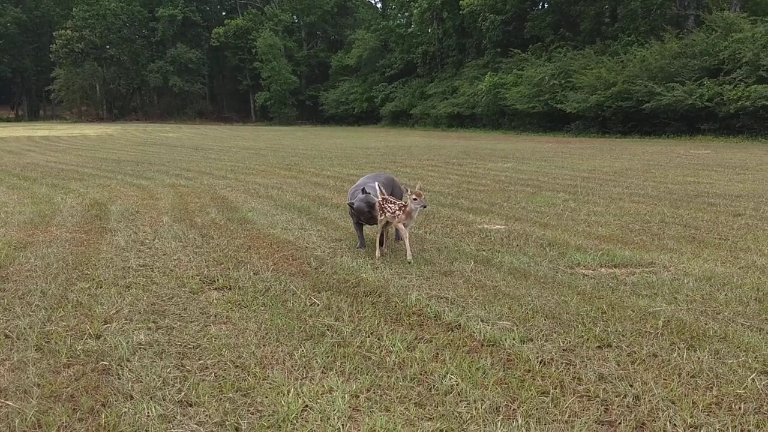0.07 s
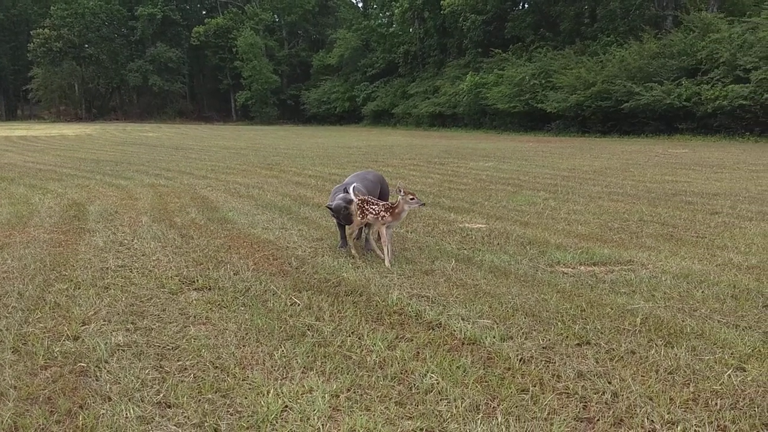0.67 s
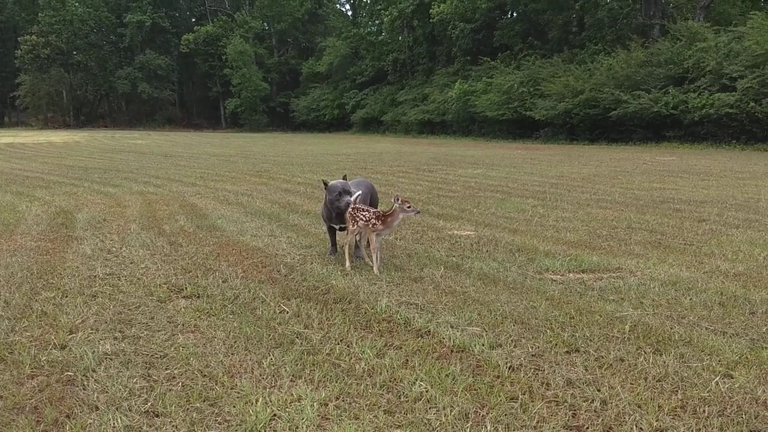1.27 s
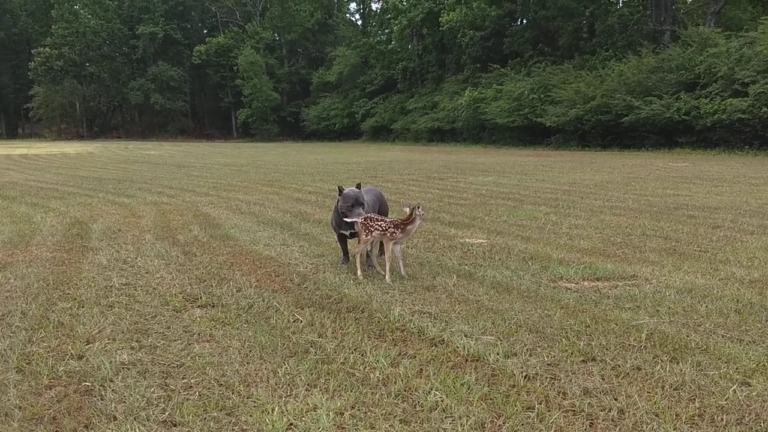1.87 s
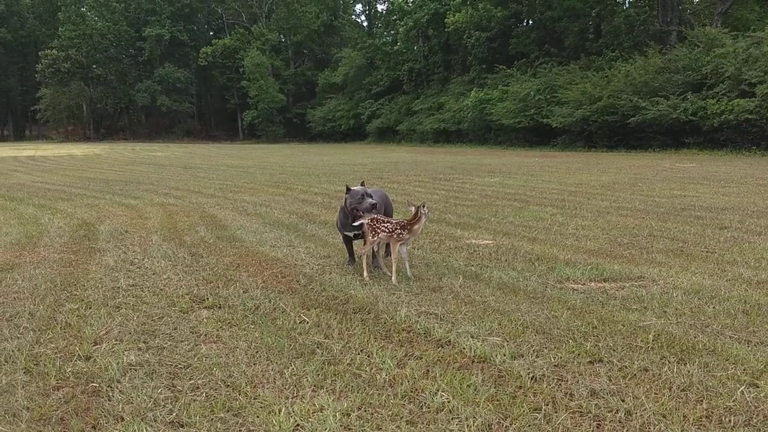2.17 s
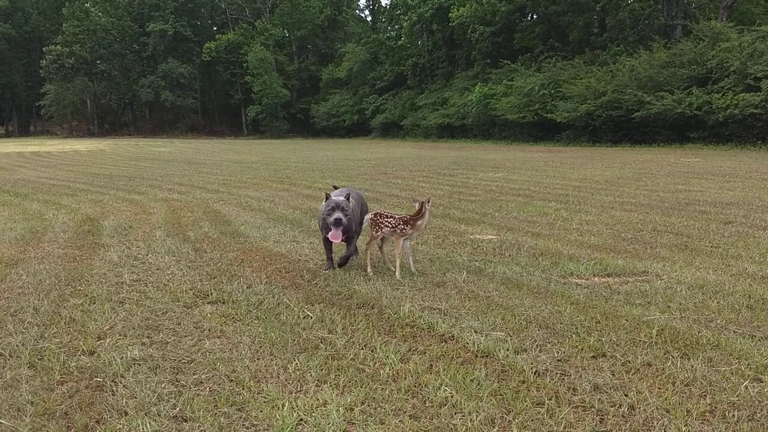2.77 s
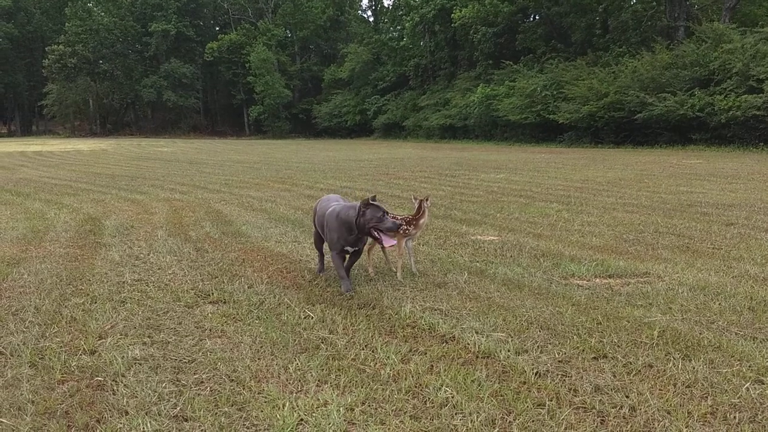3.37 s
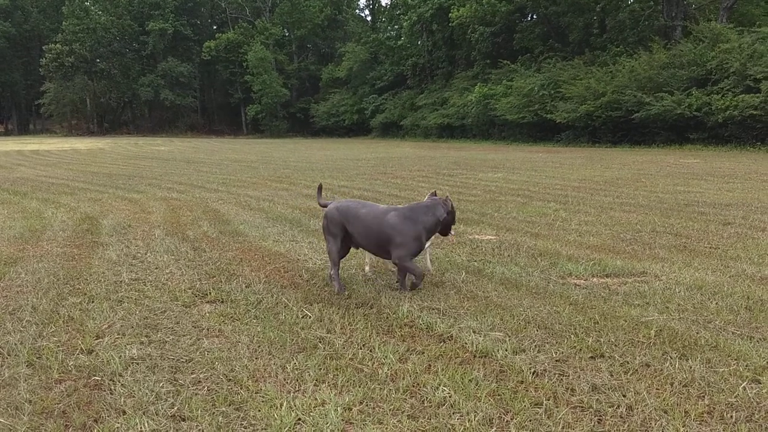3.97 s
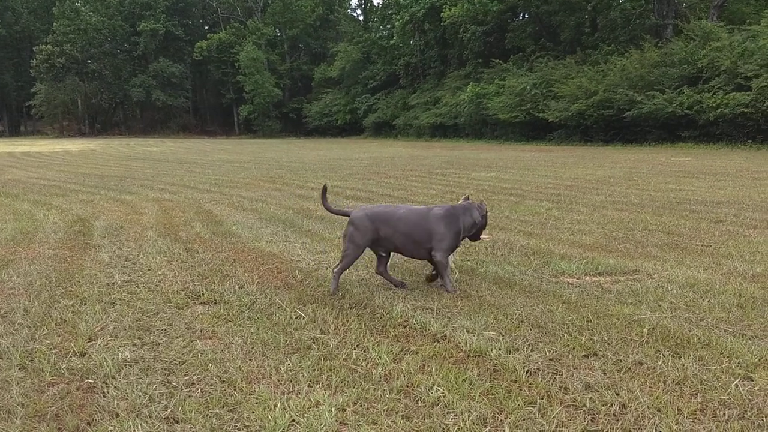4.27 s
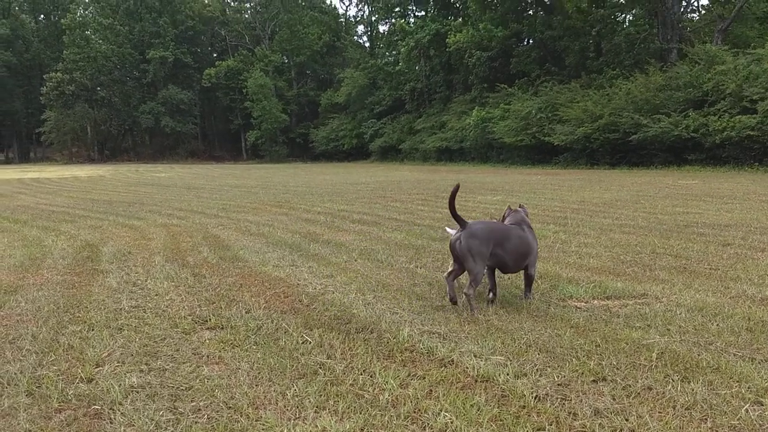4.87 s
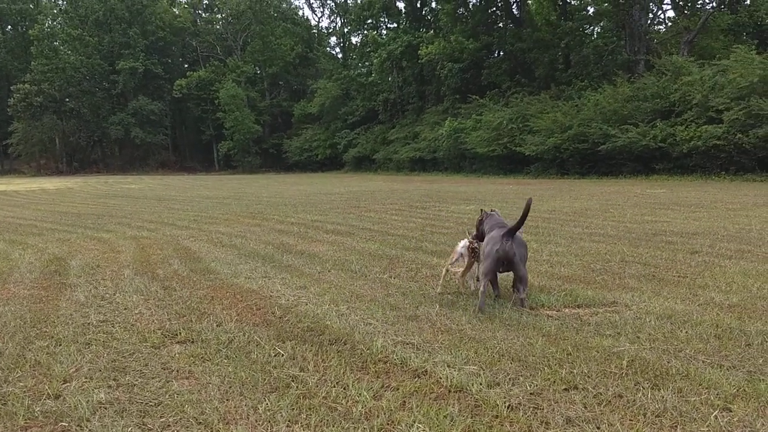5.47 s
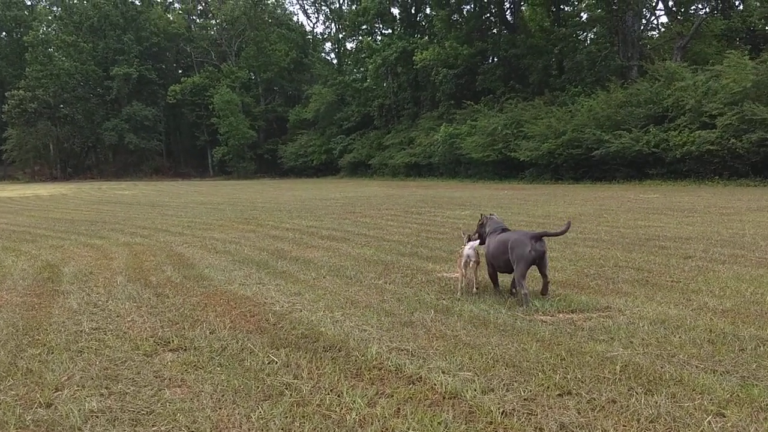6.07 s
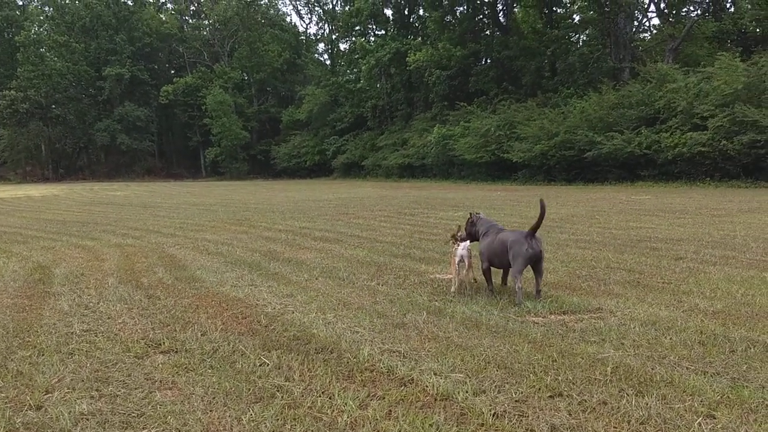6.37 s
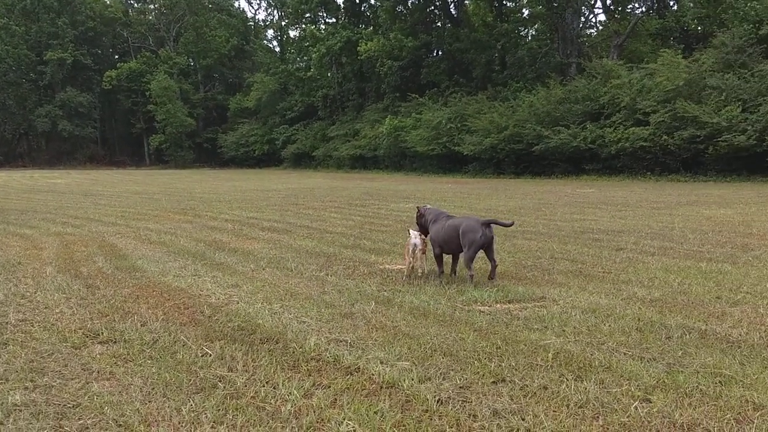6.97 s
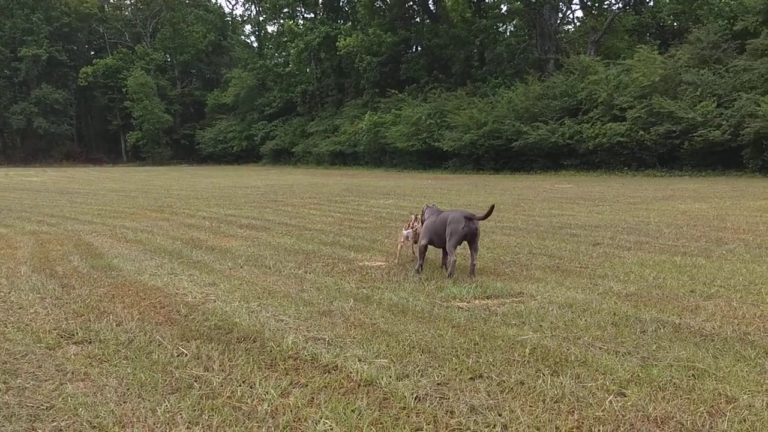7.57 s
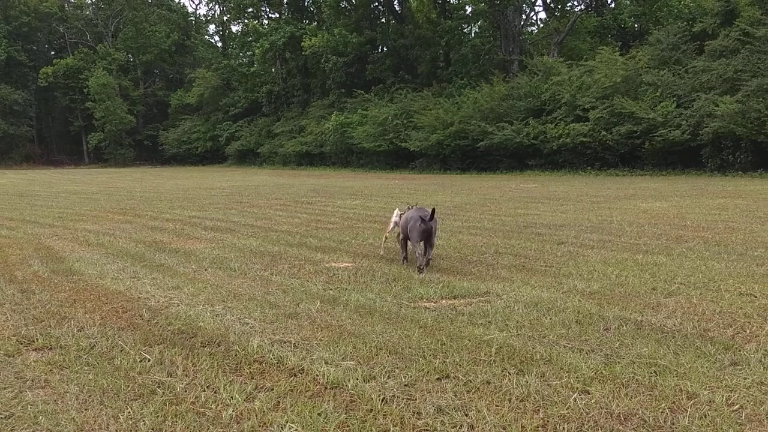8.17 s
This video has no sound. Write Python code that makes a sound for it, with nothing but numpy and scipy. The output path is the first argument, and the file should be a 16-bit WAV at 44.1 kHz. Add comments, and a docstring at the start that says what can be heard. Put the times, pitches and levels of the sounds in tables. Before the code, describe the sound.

A young deer bleats twice, about three seconds apart, each cry brief, sliding down in pitch and turning hoarse. Before the first, a big dog pants softly and a songbird begins repeating a rising whistle. Between the cries, paws rustle and snap dry grass, and a brief low puff of wind touches the microphone. Shrill insects and faraway engines and tyres continue throughout, in a field edged by trees.

```python
"""A fawn bleats twice in a mown field: a falling harmonic voice that grows hoarse and ends in a squeak.
A big dog pants in short puffs and walks on dry stubble, which crackles and snaps.
Songbirds whistle from the edge of the wood, which also echoes the bleats.
Insects shrill steadily over the engines and tyres of a distant road and a soft high hiss."""
import sys
import numpy as np
from scipy import signal
from scipy.fft import rfft, irfft
from scipy.io import wavfile

SR = 44100
rng = np.random.default_rng(int(sys.argv[2]) if len(sys.argv) > 2 else 0)


def log_audio(samples):
    """Write samples as a 16-bit WAV file to the path given in sys.argv[1]."""
    # one column per channel
    frames = np.atleast_2d(samples).T
    # limit to full scale, then quantise
    limited = np.clip(frames, -1, 1)
    pcm = np.round(limited * 32767).astype(np.int16)
    wavfile.write(sys.argv[1], SR, pcm)


N = 362061
T = np.arange(N) / SR
FREQS = np.maximum(np.fft.rfftfreq(N, 1 / SR), 1)


def fawn():
    """Two bleats, each ending in a squeak as the throat lets go."""
    # t/s, length/s, level/dB, sag/(dB/s), breath lasts/s, drop/dB, overtones/dB, their growth/(dB/s)
    bleats = [(3.964, .333, -38.5, 0, .207, 14.5, -57.3, -2),
              (6.702, 0.342, -33.5, 29, 0.277, 5.5, -54.5, 13)]
    # pitch line per bleat: t/s, f/Hz
    pitches = [
        [(3.97, 801.8), (4.002, 794.4), (4.164, 738.6), (4.22, 689), (4.29, 678.0)],
        [(6.71, 799.5), (6.77, 792), (6.914, 742.7), (6.97, 749.5), (7.038, 681)],
    ]
    # upper resonances, one mouth shape per bleat: f/Hz, gain/dB
    mouths = [
        [(4000, -12), (4550, 12), (5300, -3.5), (6300, 9), (6900, -6), (7900, -3), (8800, -10), (9700, -15),
         (11500, -14), (12600, -9), (14500, -17)],
        [(4000, -17.5), (4600, 6), (5300, 2.5), (6100, 4), (6500, 6.5), (7100, -24), (7900, -11), (8700, -15),
         (9600, -13), (10600, -15), (11500, -24), (14500, -27)],
    ]
    # throat squeaks: t/s, length/s, start f/Hz, middle f/Hz, end f/Hz, level/dB
    squeaks = [(4.292, .018, 4000, 3520, 2850, -54.5), (7.04, .018, 4080, 3540, 3020, -51.5)]
    out = np.zeros(N)
    for row, pitch, mouth in zip(bleats, pitches, mouths):
        add(out, row[0], bleat(row, pitch, mouth))
    for start_s, length_s, *line_hz, db in squeaks:
        add(out, start_s, undb(db) * chirp(glide(length_s, *line_hz), waver=.064))
    return out


def bleat(row, pitch, mouth, swell_s=.066, give_out_s=.044, scoop_s=.00198, ramp_s=.0023):
    """Vocal folds drive throat and mouth; the voice swells, holds or sags, and gives out hoarsely."""
    # main throat resonance: f/Hz, gain/dB
    throat = [(700, -22), (1550, -32.5), (2300, -44), (2700, 10), (3100, 6), (3300, -6), (3650, -17),
              (4100, -25), (4500, -47)]
    # catches in the voice: t after onset/s, length/s, depth/dB
    catches = [(0.037, .013, 5), (0.162, 0.024, 10.5)]
    start_s, length_s, db, sag_db_per_s, breath_s, drop_db, overtone_db, growth_db_per_s = row
    t = T[:int(length_s * SR)]
    scoop = 1 - .116 * np.exp(-t / scoop_s)  # pitch snaps up as the folds catch
    hz = np.interp(start_s + t, *np.transpose(pitch)) * scoop
    jitter = .0021 + .0073 * (t / length_s) ** 3
    phase = 2 * np.pi * np.cumsum(hz * (1 + jitter * wander(500, len(t)))) / SR
    k = np.arange(1, 21)[:, None]

    def harmonics(resonance):
        """Stack at rms 1; each harmonic wavers on its own as head and mouth move."""
        waver_db = 3.5 * np.array([wander(45.6, len(t)) for _ in k])
        gains = undb(at(resonance, k * hz) + waver_db)
        return (gains * np.sin(k * phase)).sum(0) / np.sqrt((gains ** 2).sum(0) / 2)

    spent = np.clip((t - breath_s) / give_out_s, 0, 1)
    onset_db = 11.5 * np.maximum(1 - t / swell_s, 0)
    sag_db = sag_db_per_s * np.maximum(t - swell_s, 0)
    catch_db = sum(depth_db * bump(t, mid_s, span_s) for mid_s, span_s, depth_db in catches)
    core_db = db - onset_db - sag_db - catch_db - drop_db * spent
    core = harmonics(throat) * undb(core_db + wander(66.6, len(t)))
    overtones = harmonics(mouth) * undb(overtone_db + growth_db_per_s * t - 6 * spent)
    return (core + overtones) * np.clip(np.minimum(t, length_s - t) / ramp_s, 0, 1)


def panting(gap_s=.108, puff_s=.049, inhale_db=-4, ends_db=-5):
    """Breath puffs through the dog's muzzle, out and in by turns, strongest in mid bout."""
    # panting bouts: t/s, length/s, level/dB
    bouts = [(1.388, .16, -57), (2.37, .05, -59), (2.784, .71, -52), (4.43, .05, -59)]
    # muzzle resonance: f/Hz, gain/dB
    muzzle = [(700, -17), (1300, 10.5), (1700, 7.5), (2200, 7.5), (2800, -1), (4000, -9), (7000, -14),
              (14000, -32)]
    puffs = []
    for start_s, length_s, db in bouts:
        times = np.arange(start_s, start_s + length_s, gap_s)
        for k, (mid_s, outer) in enumerate(zip(times, outwards(len(times)))):
            puffs.append((mid_s, puff_s, db + inhale_db * (k % 2) + ends_db * outer))
    return noise(undb(at(muzzle, FREQS))) * swells(puffs) * undb(2 * wander(210))


def paws(grain_samples=32):
    """Dry grass crackles under the dog: a light uneven rustle and a few heavier strokes."""
    # heavier paw strokes: middle t/s, length/s, level/dB
    steps = [(2.9, .12, -62), (3.25, .08, -59.5), (3.63, 0.066, -66), (5.05, .16, -66), (5.37, .089, -61.5),
             (5.69, 0.087, -53), (6.21, 0.055, -59)]
    # stubble spectrum: f/Hz, gain/dB
    stubble = [(2000, -6), (4000, -4), (7000, -8.5), (10000, -7), (12500, -0.5), (16000, 1.5)]
    grain_db = 2.2 * rng.exponential(size=N // grain_samples + 1)
    grains = unit(undb(np.repeat(grain_db, grain_samples)[:N]))
    rustle = bump(T, mid_s=5, length_s=3.6) * undb(-67.5 + 4 * wander(12))
    return noise(undb(at(stubble, FREQS))) * grains * (rustle + swells(steps))


def stalks(crack_s=.001, decay_cycles=2.4, mode_ratio=1.79):
    """Each stalk breaks with a crack and rings briefly in two modes."""
    # snapping stalks: t/s, level/dB, ring f/Hz
    snaps = [(1.8425, -36, 1360), (4.705, -45, 6450), (4.976, -29, 3560), (5.115, -43, 6900),
             (5.174, -41, 6230), (5.324, -44, 6800)]
    out, t = np.zeros(N), T[:SR // 20]
    ring = lambda hz: np.sin(2 * np.pi * hz * t) * np.exp(-t * hz / decay_cycles)
    for start_s, db, hz in snaps:
        crack = undb(-17) * rng.standard_normal(len(t)) * np.exp(-t / crack_s)
        modes = ring(hz) + undb(-9) * ring(mode_ratio * hz)
        add(out, start_s, undb(db) * (modes + crack))
    return out * pan(9.8)


def birds(echo_s=.052, echo_db=-12):
    """All songs, thrown back once by the tree line."""
    songs = arched_notes() + trill() + upslurs() + chips()
    return songs + undb(echo_db) * np.interp(T - echo_s, T, songs)


def arched_notes():
    """Scattered whistles that rise and fall back."""
    # bird notes: t/s, length/s, foot f/Hz, top f/Hz, level/dB, shape (1 pointed, 3 flat-topped)
    notes = [(.075, .17, 3600, 4680, -59, 1.35), (.93, .14, 1760, 1927, -66, 1.9),
             (1.148, 0.046, 3100, 3400, -59, 3), (1.859, .2, 1690, 1890, -67, 1.9),
             (2.198, 0.15, 3880, 4620, -56, 2.1), (2.438, 0.037, 4070, 4870, -57, 1.2),
             (2.541, .062, 4100, 5590, -62, 2), (2.624, .038, 4320, 5150, -58, 2.4)]
    out = np.zeros(N)
    for start_s, length_s, foot_hz, top_hz, db, shape in notes:
        from_top = np.abs(np.linspace(-1, 1, int(length_s * SR))) ** shape
        hz = top_hz + (foot_hz - top_hz) * from_top
        add(out, start_s, undb(db) * chirp(hz, waver=.0066, roundness=.84))
    return out


def trill(start_s=.312, length_s=.155, rate_hz=88, centre_hz=4720, depth_hz=750):
    """A buzz of tiny falling sweeps, each loudest halfway down."""
    out = np.zeros(N)
    cycle = rate_hz * T[:int(length_s * SR)] % 1
    hz = centre_hz + depth_hz * (1 - 2 * cycle)
    sweeps = chirp(hz, waver=.0095, roundness=.4) * np.sin(np.pi * cycle) ** 2
    add(out, start_s, undb(-60) * unit(sweeps))
    return out


def upslurs(lead_in_s=2.09, length_s=.054, from_hz=2300, to_hz=3830, glide_s=.0135):
    """One lead-in note, then a slightly quickening run of the same rising whistle."""
    out = np.zeros(N)
    hz = to_hz + (from_hz - to_hz) * np.exp(-T[:int(length_s * SR)] / glide_s)
    for start_s in [lead_in_s, *series(start_s=2.208, gap_s=.2422, stretch_s=-.00044, count=12)]:
        add(out, start_s, undb(-56) * chirp(hz, waver=.015, roundness=.67))
    return out


def chips(centre_hz=3080, length_s=.024, ends_db=-5.5):
    """A farther bird's falling chips; the string slows, swells and fades."""
    out = np.zeros(N)
    times = series(start_s=5.004, gap_s=.127, stretch_s=.0006, count=8)
    for start_s, outer in zip(times, outwards(len(times))):
        hz = centre_hz * (1 + .022 * rng.standard_normal())
        line_hz = glide(length_s, hz * .98, hz * 1.02, hz * .9)
        add(out, start_s, undb(-63 + ends_db * outer) * chirp(line_hz, waver=.021))
    return out


def wood(x, delay_s, t60_s=1.0, build_s=.0098):
    """Trunks and foliage scatter a diffuse, fading echo."""
    t = T[:SR]
    onset = np.clip((t - delay_s) / build_s, 0, 1)
    tail = rng.standard_normal((2, SR)) * undb(-60 * t / t60_s) * onset
    return signal.fftconvolve(x[None], unit(tail) / np.sqrt(SR), axes=1)[:, :N]


def road():
    """Distant engine rumble and tyre noise surge together."""
    # traffic surges: middle t/s, length/s, rise/dB
    surges = [(5.83, 2.54, 2), (5.16, 0.33, 3), (6.88, 0.1, 3)]
    # engine spectrum: f/Hz, gain/dB
    engines = [(20, -44), (32, -39), (50, -21.5), (72, -5), (100, -8), (145, 0.5), (200, -2.5), (260, -8),
               (340, -15), (500, -51.5)]
    # tyre spectrum: f/Hz, gain/dB
    tyres = [(250, -36), (400, -3.5), (520, -2), (620, -1), (890, -0.5), (1100, -10.5), (1300, -11),
             (1800, -17), (2200, -28.5), (4000, -36)]
    surge_db = sum(db * bump(T, mid_s, length_s) for mid_s, length_s, db in surges)
    rumble = noise(undb(at(engines, FREQS))) * undb(-48.5 + .85 * surge_db + .57 * wander(11))
    rolling = noise(undb(at(tyres, FREQS))) * undb(-52 + surge_db + .5 * wander(12))
    return rumble * pan(-2.1) + rolling * pan(-2)


def low_hums():
    """Low hums swell and fade: distant engines, and one brief low rumble of wind on the microphone."""
    # narrow noise bands: middle t/s, length/s, f/Hz, width/Hz, level/dB
    hums = [(3.5, 1.6, 143.9, 16, -54.5), (5.25, 0.37, 85, 25, -53.5), (6.3, 1.3, 205, 49.4, -57),
            (6.9, 1.1, 262, 50, -55)]
    out = np.zeros(N)
    for mid_s, length_s, hz, width_hz, db in hums:
        phase = 2 * np.pi * hz * T
        band = wander(width_hz) * np.sin(phase) + wander(width_hz) * np.cos(phase)
        out += band * undb(db) * bump(T, mid_s, length_s)
    return out * pan(-1.5)


def tyre_whines(waver_hz=3, waver_db=2):
    """Tyres sing on the road, wavering slightly."""
    # whines: middle t/s, length/s, f/Hz, level/dB
    whines = [(.6, 1.8, 1232, -69.5), (1.1, 0.89, 614, -60.5), (3.5, 1.85, 596, -60),
              (5.253, 0.53, 631, -50.5), (5.8, 1.3, 885, -61), (6.7, 2, 638, -58)]
    out = np.zeros(N)
    for mid_s, length_s, hz, db in whines:
        phase = 2 * np.pi * np.cumsum(hz + waver_hz * wander(30)) / SR
        out += np.sin(phase) * undb(db + waver_db * wander(14)) * bump(T, mid_s, length_s)
    return out


def insects(centre_hz=5404, width_hz=180):
    """A steady chorus merges into one shrill noise band."""
    band = np.exp(-((FREQS - centre_hz) / width_hz / 2) ** 2)
    return noise(band) * undb(-62.5 + wander(25)) * pan(-2.1)


def high_hiss():
    """A soft, steady high hiss lies under the scene."""
    # hiss spectrum: f/Hz, gain/dB
    hiss = [(1200, -20), (2200, 2.5), (3000, 1), (3700, -3), (4600, -1), (6200, -7.5), (7500, -12.5),
            (9500, -14), (12000, -7.5), (15500, -7)]
    return noise(undb(at(hiss, FREQS))) * undb(-62.5 + .5 * wander(17)) * pan(-2.1)


def noise(gain):
    """Stereo noise of a given colour at rms 1; the lows are partly alike on both sides."""
    # likeness of the sides: f/Hz, left-right correlation
    likeness = [(30, 0.19), (125, 0.47), (250, 0.75), (550, 0.63), (900, 0.75), (1300, 0.00049), (3000, 0),
                (9000, 0)]
    alike = at(likeness, FREQS)
    mid, side = rfft(rng.standard_normal((2, N)))
    spectra = mid * np.sqrt(1 + alike) + np.array([[1], [-1]]) * side * np.sqrt(1 - alike)
    return unit(irfft(gain * spectra, N))


def chirp(hz, waver, roundness=.66):
    """A near-pure whistle that swells and fades along a pitch line."""
    size = len(hz)
    phase = 2 * np.pi * np.cumsum(hz * (1 + waver * wander(317, size))) / SR
    return unit(np.sin(phase) * np.sin(np.pi * np.arange(size) / size) ** roundness)


def glide(length_s, *pitches_hz):
    """A smooth line through pitches evenly spaced in time."""
    curve = np.polyfit(np.linspace(0, 1, len(pitches_hz)), pitches_hz, len(pitches_hz) - 1)
    return np.polyval(curve, np.linspace(0, 1, int(length_s * SR)))


def wander(rate_hz, size=N):
    """Random drift with a spread near 1."""
    knots = rng.standard_normal(4096)
    return 1.24 * np.interp(np.arange(size) * rate_hz / SR, np.arange(len(knots)), knots)


def bump(t, mid_s, length_s):
    """A smooth rise to 1 and fall."""
    return np.exp(-2 * ((t - mid_s) / length_s) ** 2)


def swells(rows):
    """Gain curve with one bump per event."""
    return sum(undb(db) * bump(T, mid_s, length_s) for mid_s, length_s, db in rows)


def series(start_s, gap_s, stretch_s, count):
    """Times of a repeated note whose pace drifts evenly."""
    k = np.arange(count)
    return start_s + gap_s * k + stretch_s * k ** 2


def outwards(count):
    """Per member of a series: 0 in the middle, nearing 1 at both ends."""
    return (2 * (np.arange(count) + .5) / count - 1) ** 2


def undb(db):
    """Decibels to gain."""
    return 10 ** (np.asarray(db) / 20)


def unit(x):
    """Scale to rms 1."""
    return x / np.sqrt(np.mean(x ** 2))


def at(points, hz):
    """Read a spectrum on a log-frequency axis."""
    f, value = np.transpose(points)
    return np.interp(np.log(hz), np.log(f), value)


def pan(db):
    """Stereo gains for a left-minus-right level."""
    return undb(np.array([[db], [-db]]) / 2)


def add(out, start_s, x):
    """Mix x in at start_s."""
    i = int(start_s * SR)
    out[..., i:i + x.shape[-1]] += x[..., :N - i]


def scene():
    """The fawn stands to the right; the birds sit in the trees; a thin high tone lies under it all."""
    cries, songs = fawn(), birds()
    echoes = undb(-13.5) * wood(cries, delay_s=.051) + undb(-4) * wood(songs, delay_s=.0045)
    dog = panting() + paws() + stalks()
    thin_tone = undb(-81) * np.sin(2 * np.pi * 14000 * T)
    background = road() + low_hums() + tyre_whines() + insects() + high_hiss() + thin_tone
    return cries * pan(-12.5) + songs * pan(1) + echoes + dog + background


def record(dry, crossfeed=.71, corner_hz=550, lag_s=20 / SR, top_hz=15850):
    """The recorder widens by feeding each side, late and inverted, to the other, then cuts the top."""
    share = crossfeed * FREQS ** 2 / (FREQS ** 2 + corner_hz ** 2)  # spares the bass
    sides = rfft(dry)
    late_opposite = np.exp(-2j * np.pi * FREQS * lag_s) * sides[::-1]
    wide = irfft((sides - share * late_opposite) / (1 + share), N)
    return signal.sosfilt(signal.ellip(10, .2, 70, top_hz, fs=SR, output="sos"), wide)


dry = scene()
out = record(dry)
log_audio(out)
```